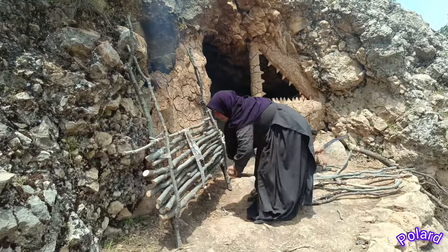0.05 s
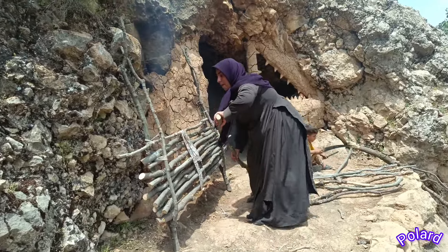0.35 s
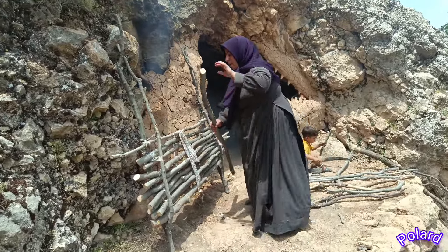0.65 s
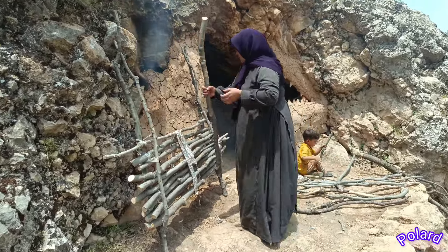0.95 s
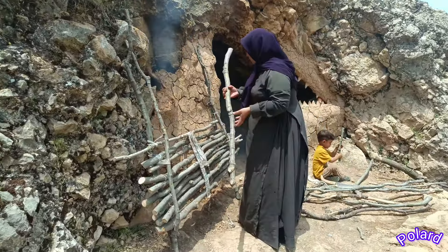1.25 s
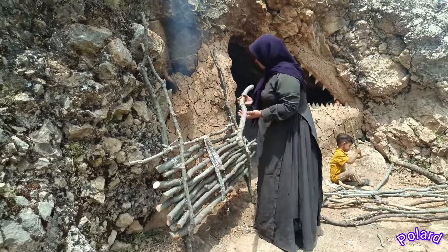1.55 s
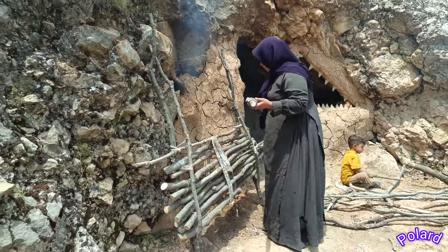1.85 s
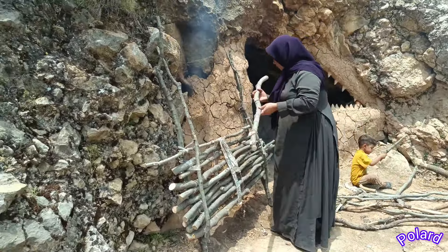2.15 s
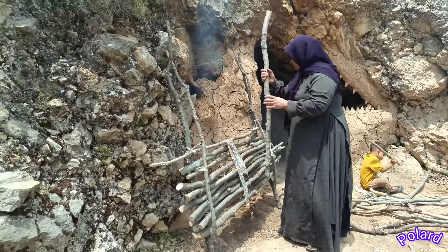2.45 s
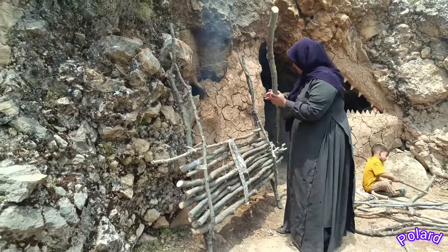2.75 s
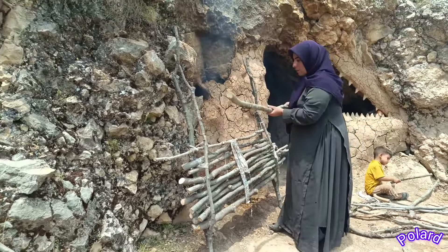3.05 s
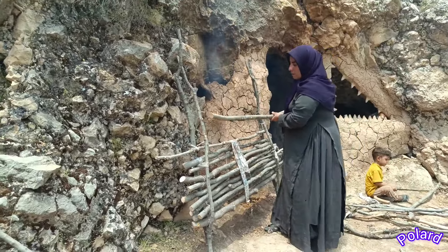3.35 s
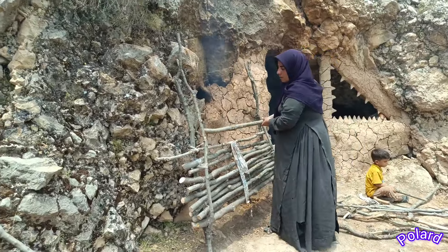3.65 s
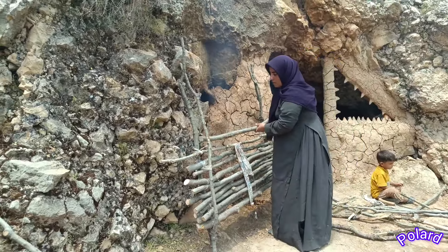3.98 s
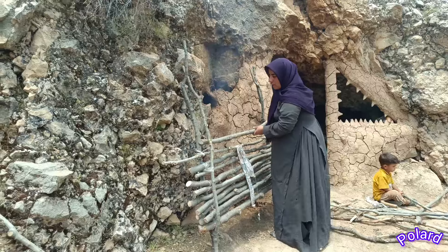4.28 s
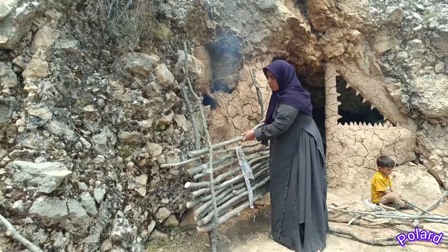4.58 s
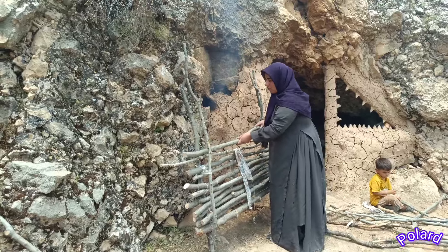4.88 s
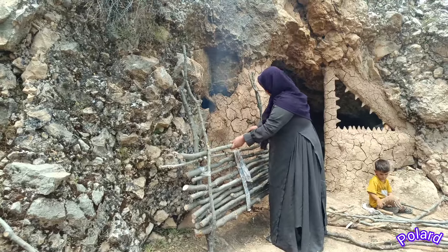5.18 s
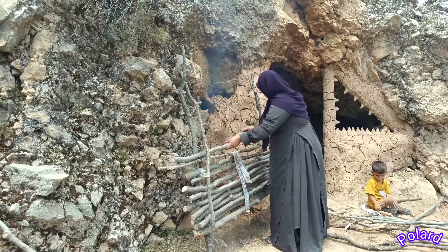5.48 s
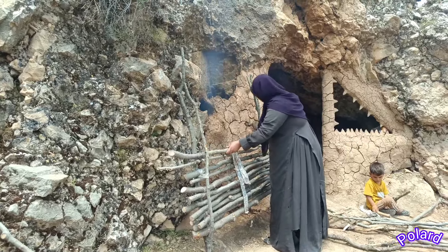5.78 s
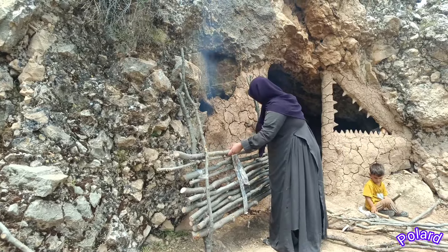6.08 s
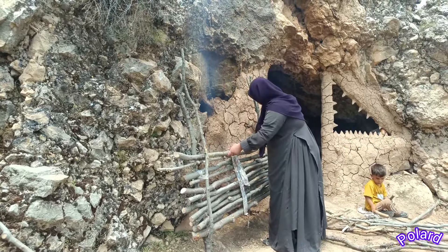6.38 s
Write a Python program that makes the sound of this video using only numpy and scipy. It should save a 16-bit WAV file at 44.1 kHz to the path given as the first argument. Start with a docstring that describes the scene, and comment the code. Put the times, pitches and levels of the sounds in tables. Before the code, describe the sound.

Dry sticks tap, chatter and skid against a wooden gate, close to the microphone. One is struck home with a loud, bright clack, followed soon by a second, hollower knock. Softer bumps, rasps and rustles of bark and cloth continue, with a small twig snap. Near the end a distant bird chirps a few times. The outdoor air is quiet, and nearby rock adds a faint echo.

```python
"""Sticks worked into a gate

Dry sticks knock, chatter and skid on a lashed wooden gate, close by; twice one is struck home hard.
Each impact excites the bending modes of the wood and the dense, short ring of the whole bundle.
Friction of bark and cloth rustles and rasps between the knocks, and a rock face reflects a faint tail.
A far bird chirps and a thin twitter flickers over the quiet outdoor air."""
import sys
import numpy as np
from scipy import signal
from scipy.fft import rfft, irfft, next_fast_len
from scipy.io import wavfile
from scipy.ndimage import uniform_filter1d

SR = 44100
rng = np.random.default_rng(int(sys.argv[2]) if len(sys.argv) > 2 else 0)


def to_wav(s):
    """Save 16-bit WAV."""
    ch = np.atleast_2d(s).T  # columns
    pcm = np.round(np.clip(ch, -1, 1) * 32767)  # PCM
    wavfile.write(sys.argv[1], SR, pcm.astype(np.int16))


N = 283384

# left-right coherence of diffuse sound and of the near wood: (frequency [Hz], coherence [0-1])
AIR_COHERENCE = [(40, 0.2), (150, 0.32), (500, 0.29), (1500, 0.08), (4000, 0), (15000, 0)]
WOOD_COHERENCE = [(150, 0.89), (700, 0.98), (2000, 0.36), (4000, 0.41), (12000, 0.21)]


def amp(db):
    """Amplitude ratio of a level in decibels."""
    return 10 ** (np.asarray(db) / 20)


def unit(x):
    """Normalisation to a mean energy of 1 per channel."""
    return x / np.sqrt(np.sum(x ** 2) / 2 + 1e-30)


def read(points, hz):
    """Interpolation of (frequency [Hz], value) points on a logarithmic frequency axis."""
    f, value = np.transpose(points)
    return np.interp(np.log(hz + 1), np.log(f + 1), value)


def add(mix, s, sound):
    """Superposition: a stereo sound joins the mix at time s."""
    part = mix[:, max(round(s * SR), 0):][:, :sound.shape[1]]
    part += sound[:, :part.shape[1]]


def noise(spectrum, coherence, size):
    """Partially coherent stereo noise with a spectrum of (frequency [Hz], density [dB]) points."""
    hz = np.fft.rfftfreq(size, 1 / SR)
    a, b = rfft(rng.standard_normal((2, size)))
    same = np.clip(read(coherence, hz), 0, 1)
    mid, side = np.sqrt(1 + same) * a, np.sqrt(1 - same) * b
    return irfft(np.array([mid + side, mid - side]) * amp(read(spectrum, hz)), size)


def crackle(rate, size, life_s):
    """Shot-noise envelope: random catches of uneven strength, each decaying exponentially."""
    catches = (rng.random(size) < rate / SR) * rng.exponential(1, size)
    return signal.lfilter([1], [1, -np.exp(-1 / (life_s * SR))], catches)


def die_away(x, t60s, frame, hold_s=0, damping=1):
    """Frequency-dependent damping: after hold_s, each frequency decays at its own rate."""
    hz, t, spectra = signal.stft(x, SR, nperseg=frame)
    decay = amp(-60 * damping * np.maximum(t - hold_s, 0) / read(t60s, hz)[:, None])
    return signal.istft(spectra * decay, SR, nperseg=frame)[1][:, :x.shape[1]]


def equalise(x, band_db, left_lag_ms=0):
    """A minimum-phase filter sets five band energies, each given as the rms level of a 10 ms burst."""
    # band centres: (thud [Hz], body [Hz], clack [Hz], crack [Hz], tick [Hz])
    bands_hz = [200, 650, 1800, 4000, 9500]
    size = next_fast_len(2 * x.shape[1], True)
    hz, spectrum = np.fft.rfftfreq(size, 1 / SR), rfft(x, size)
    shares = np.array([np.interp(np.log(hz + 1), np.log(bands_hz), row) for row in np.eye(5)])
    power = (abs(spectrum) ** 2).mean(0) * 2 / size / (SR / 100)
    gain_db = np.zeros(len(hz))
    for _ in range(3):  # the bands overlap, so the gains settle by iteration
        reached_db = 10 * np.log10(shares ** 2 @ (power * amp(gain_db) ** 2) + 1e-30)
        gain_db += (band_db - reached_db) @ shares
    cepstrum = irfft(np.log(amp(gain_db)), size)
    spectrum *= np.exp(rfft(2 * cepstrum[:size // 2], size) - cepstrum[0])
    spectrum[0] *= np.exp(-2j * np.pi * hz * left_lag_ms / 1000)
    return irfft(spectrum, size)[:, :x.shape[1]]


def air(db=-64.5):
    """Quiet outdoor air: a diffuse field of stationary noise."""
    # ambient spectrum: (frequency [Hz], density [dB])
    spectrum = [(20, -6.5), (42, -22), (70, -8.5), (125, 0.5), (290, 0), (450, -4), (700, -4.5), (1100, -9),
                (2200, -10), (4000, -15), (6300, -17), (7100, -21), (9300, -19), (11500, -23.5),
                (15800, -21.5)]
    return amp(db) * np.sqrt(N) * unit(noise(spectrum, AIR_COHERENCE, N))


def twitter(db=-83, hz=6250, flickers_per_s=7):
    """Very distant birds or insects: narrow-band noise under random amplitude modulation."""
    marks = np.arange(0, N / SR + 1, 1 / flickers_per_s)
    flicker = np.interp(np.arange(N) / SR, marks, rng.random(len(marks)) ** 2)
    band = [(.85 * hz, -40), (.96 * hz, 0), (1.03 * hz, 0), (1.1 * hz, -45)]
    return amp(db) * flicker * np.sqrt(N) * unit(noise(band, AIR_COHERENCE, N))


def bird(length_s=.0181, fall=.278, blur_s=.0063, rasp=.084):
    """Falling chirps, roughened by frequency jitter and blurred by multipath scattering."""
    # calls: (time [s], level [dB], starting pitch [Hz])
    chirps = [(5.715, -70, 2300), (5.857, -66, 2510), (5.983, -61, 2566), (6.165, -64, 2500),
              (6.353, -65.5, 2435)]
    out, t = np.zeros((2, N)), np.arange(2048) / SR
    progress = np.clip(t / length_s, 0, 1)
    for s, db, hz in chirps:
        jitter = rasp * uniform_filter1d(rng.standard_normal(len(t)), size=36) * np.sqrt(36)
        pitch_hz = hz * (1 - fall * progress + jitter)
        chirp = np.sin(np.pi * progress) * np.sin(2 * np.pi * np.cumsum(pitch_hz) / SR)
        paths = rng.standard_normal((2, len(t))) * np.exp(-t / blur_s)
        scattered = signal.fftconvolve(paths, chirp[None], axes=1)
        add(out, s, amp(db) * np.sqrt(length_s * SR) * unit(scattered))
    return out


def rock(x, echo_db=-35, build_s=.023):
    """Reverberation: reflections from the rock face and its hollows merge into a faint tail."""
    # reverberation times: (frequency [Hz], T60 [s])
    t60s = [(150, 2.1), (700, 0.4), (2500, 1.2), (5000, 0.9), (12000, 0.11)]
    colour = [(80, -6), (250, 0), (700, 4.5), (2000, -10), (2700, -9), (3400, -5.5), (5000, -2),
              (15000, -16.5)]
    tail = die_away(noise(colour, AIR_COHERENCE, SR), t60s, frame=256)
    tail *= 1 - np.exp(-np.arange(SR) / SR / build_s)
    return amp(echo_db) * signal.fftconvolve(x, unit(tail), axes=1)[:, :N]


def low_swell(s=.572, length_s=.11, db=-62):
    """A soft swell of low-frequency noise rises and fades once."""
    swell = np.sin(np.pi * np.clip((np.arange(N) / SR - s) / length_s, 0, 1))
    colour = [(30, -25), (55, -14), (90, 0), (150, -1), (300, -20), (2000, -50)]
    return amp(db) * swell * np.sqrt(N) * unit(noise(colour, WOOD_COHERENCE, N))


def rasps(width=.05, size=16384):
    """Stick-slip friction: bark drawn under the lashing excites one narrow resonance."""
    # pulls: (time [s], length [s], resonance [Hz], level [dB])
    pulls = [(3.3, .22, 4400, -75.5), (5.056, 0.17, 3400, -74), (5.422, 0.15, 3270, -69)]
    out = np.zeros((2, N))
    near, far = 1 + width, 1 + 4 * width
    for s, length, hz, db in pulls:
        swell = np.sin(np.pi * np.clip(np.arange(size) / SR / length, 0, 1))
        band = [(hz / far, -30), (hz / near, -8), (hz, 0), (hz * near, -8), (hz * far, -30)]
        add(out, s, amp(db) * swell * np.sqrt(size) * unit(noise(band, AIR_COHERENCE, size)))
    return out


def snaps(fade_s=.004, size=1024):
    """Brittle fracture: a twig or flake of bark snaps with one bright, dry tick."""
    # fractures: (time [s], level [dB])
    fractures = [(1.298, -64), (2.679, -64), (2.699, -70), (2.757, -71), (4.345, -69), (5.376, -51.5)]
    colour = [(500, -32), (2500, -3.5), (6000, -14), (8200, 9), (9800, -1), (12000, -1), (16000, -14)]
    out = np.zeros((2, N))
    for s, db in fractures:
        tick = noise(colour, WOOD_COHERENCE, size) * np.exp(-np.arange(size) / SR / fade_s)
        add(out, s, amp(db) * np.sqrt(SR / 100) * unit(tick))
    return out


def rubs(grain=2.4, size=16384):
    """Sliding friction of bark and cloth: a grainy hiss swells and fades, with twig ticks in it."""
    # strokes: (time [s], nominal length [s], strength [dB], brightness [dB])
    strokes = [(0, .11, -57, -5), (.521, .058, -63.5, 5), (1.214, .11, -57, -2), (1.33, .14, -58.5, -0.5),
               (2.278, .076, -67, 4), (2.89, .072, -59.5, 6.5), (3.13, .16, -63.5, -2),
               (3.306, .31, -61, 0.5), (4.721, .37, -61, 0), (4.929, .23, -57, 0.5), (5.21, .21, -66, 3.5),
               (5.426, .098, -61, 6.5)]
    # thud to tick band: levels [dB], and what one dB of brightness adds
    colour_db, brightening = np.array([-1, -4.5, .5, -2, -2]), np.array([-1.2, -.24, -.1, .41, .85])
    spectrum = [(50, -30), (170, -1.5), (600, .5), (3050, -9), (3350, -8.5), (3650, -6.5), (4600, -10),
                (6500, -10), (9000, -1.5), (12000, -15.5), (16000, -14)]
    out = np.zeros((2, N))
    for s, length, db, bright_db in strokes:
        progress = np.clip(np.arange(size) / min(1.29 * length * SR, size), 0, 1)
        swell = (4 * progress * (1 - progress)) ** .75
        catches = np.exp(grain * uniform_filter1d(rng.standard_normal(size), size=100))
        twigs = .7 * crackle(120, size, life_s=.002)
        hiss = noise(spectrum, AIR_COHERENCE, size) * swell * (catches + twigs)
        add(out, s - .012, equalise(hiss, db + colour_db + bright_db * brightening))
    return out


def bending_ring(modes, t, free_s, damping, detune):
    """Modal vibration: damped sinusoids, each detuned at random by the grip."""
    hz, db, t60 = np.transpose(modes)[:, :, None]
    shift, phase, skew = rng.standard_normal((3, len(modes), 1))
    angle = 2 * np.pi * (hz * (1 + detune * shift) * t + phase)
    spread = .34 * skew * np.arccos(np.clip(read(WOOD_COHERENCE, hz), 0, 1))
    decay = amp(db - 60 * damping * free_s / t60)
    return np.array([(decay * np.sin(angle + side * spread)).sum(0) for side in (-1, 1)])


def bundle_ring(chatter_s, damping, size):
    """Modal overlap: the bundle rings as uneven noise, fed during contact and decaying after it."""
    # response of the bundle: (frequency [Hz], density [dB])
    spectrum = [(40, -35), (90, -30), (160, -4.5), (270, 6), (420, -5.5), (680, -1.5), (1300, 3), (2400, 1),
                (4300, -10), (5600, -15), (7000, -20.5), (9200, -18.5), (12000, -42), (16000, -30.5)]
    # its decay: (frequency [Hz], T60 [s])
    t60s = [(150, 0.25), (500, 0.083), (1500, 0.088), (4000, 0.091), (10000, 0.075)]
    ring = die_away(noise(spectrum, WOOD_COHERENCE, size), t60s, 128, chatter_s, damping)
    return ring * np.exp(2 * uniform_filter1d(rng.standard_normal(size), size=49))


def strike(s, band_db, chatter_s, modes, ring_db, tick_db, damping, detune, rise_s, impact, impact_s,
           catches, size, low_hz=90):
    """Impact excitation: a stick chatters on another, then its modes and the bundle ring freely."""
    # place of the hands along the gate: (time [s], lag of the left channel [ms])
    hands = [(.42, 0.04), (.5, -0.082), (.66, .16), (1.06, .14), (1.3, .03), (1.87, .205), (2.63, .28),
             (2.82, 0.4), (3.02, -0.14), (4.62, -.05), (5.8, 0.032)]
    t = np.arange(size) / SR
    free_s = np.maximum(t - chatter_s, 0)  # time since the contact ended
    ring = bending_ring(modes, t, free_s, damping, detune)
    bundle = bundle_ring(chatter_s, damping, size)
    force = (1 - np.exp(-t / rise_s)) * (1 + impact * np.exp(-t / impact_s))  # hardest at first
    force *= 1 + .2 * crackle(220, size, life_s=.001) * (t < chatter_s)  # repeated contacts
    body = (unit(bundle) + amp(ring_db) * unit(ring)) * force
    first_touch = 1.5 * np.exp(-abs(t - .0014) / .001)
    bark = catches * crackle(300, size, life_s=.0006) * np.exp(-free_s / .0067)
    tick_colour = [(300, 9.5), (2000, 2.5), (6000, -13), (9200, 3.5), (16000, -24)]
    ticks = noise(tick_colour, WOOD_COHERENCE, size) * (first_touch + bark)
    # thin wood radiates almost no deep bass
    radiation = signal.butter(3, low_hz, "high", fs=SR, output="sos")
    sound = signal.sosfilt(radiation, body + amp(tick_db) * unit(ticks))
    return s, equalise(sound, band_db, left_lag_ms=np.interp(s, *np.transpose(hands)))


def contact(row, colour_db, modes, brief_s=.0028, **touch):
    """Contact stiffness: bare wood is bright, lashing dull; the briefest touches are damped most."""
    # gain per dB of hardness, in the bands of colour_db: (body, clack, crack, tick [dB/dB])
    hardening = (-1.06, -0.022, 0.75, 0.57)
    s, strength_db, hardness_db, thud_db, chatter_s = row  # the thud is the weight behind the stick
    shape_db = np.array(colour_db) + hardness_db * np.array(hardening)
    shape_db -= 10 * np.log10(np.sum(amp(shape_db) ** 2))
    grip = .83 + (brief_s / max(chatter_s, .001)) ** 2
    return strike(s, np.r_[thud_db, strength_db + shape_db], chatter_s, modes, damping=grip, **touch)


def bumps(bounce_s=.037):
    """Dull impacts excite the frame's low modes; after each blow it falls back and rebounds once."""
    # bumps: (time [s], strength [dB], hardness [dB], thud [dB], chatter [s])
    hits = [(.486, -51.5, -6, -53.5, .014), (3.88, -52.5, -1, -46.5, 0.0071),
            (4.285, -56.5, 3.5, -56, 0.0081), (5.172, -45.5, -12.5, -56, 0.0069),
            (5.828, -53, -7.5, -53.5, 0.015)]
    # falls against the lashing: (time [s], strength [dB])
    falls = [(1.968, -49.5), (2.807, -46)]
    # modes of the frame: (frequency [Hz], level [dB], T60 [s])
    modes = [(131, -9, 0.15), (209.5, -6.5, 0.13), (315, -3.5, 0.068), (392, -14, 0.072), (568, -8, 0.059),
             (625, -12, 0.11), (1104, -12, 0.07), (1200, -14, 0.081)]
    out, rows = np.zeros((2, N)), list(hits)
    for s, db in falls:
        rows += [(s, db, -14, db - 1, .0099), (s + bounce_s, db - 17.5, 0, db - 9.5, .004)]
    for row in rows:
        add(out, *contact(row, (.5, -1.5, -1, -3), modes, ring_db=2, tick_db=-27, detune=.022,
                          rise_s=.00032, impact=.42, impact_s=.007, catches=1, size=5120))
    return out


def skids():
    """Intermittent contact: a stick skids along the loose rail and excites its lightly damped modes."""
    # skids: (time [s], strength [dB], hardness [dB], thud [dB], chatter [s])
    hits = [(0.812, -46.5, 2, -48.5, 0.0099), (0.883, -40, -2.5, -52, 0.014), (0.904, -46.5, 4, -72, 0.022),
            (.982, -43, 2.5, -52.5, 0.032), (1.032, -47, 12, -89, 0.017), (1.053, -46.5, 2, -59, .011),
            (1.155, -54, -4, -59, 0.025)]
    # modes of the rail: (frequency [Hz], level [dB], T60 [s])
    modes = [(516.4, -9, 0.37), (594, -2.5, 0.14), (632, 0, 0.22), (738, -7, 0.32), (970, -12, 0.5),
             (1140, -10, 0.23), (1296, -6, 0.24), (1670, -8, 0.13), (2136, -6, 0.1), (2480, -15, 0.13),
             (2760, -23, .1), (3770, -10, 0.047), (4300, -17, .06)]
    out = np.zeros((2, N))
    for row in hits:
        add(out, *contact(row, (2.5, .5, -3, -4), modes, ring_db=2.5, tick_db=-18.5, detune=.016,
                          rise_s=.0004, impact=.3, impact_s=.0082, catches=1.6, size=8192))
    return out


def taps(note_db=2, note_t60_s=.045):
    """A collision excites both bodies: the tapping stick adds its note to the modes of the upright."""
    # taps: (time [s], strength [dB], hardness [dB], thud [dB], chatter [s], stick note [Hz])
    hits = [(.135, -54, 1, -55, 0.011, 1250), (.178, -48, -2.5, -47.5, .008, 3500),
            (.197, -54, 1, -79, 0.0066, 2600), (0.264, -43.5, -2, -51, .016, 1500),
            (.279, -51, -5.5, -50.5, 0.0087, 680), (.393, -36, -4.5, -49.5, 0.018, 1950),
            (0.429, -48.5, 1, -56, .005, 1850), (.465, -49, -8, -62, 0.025, 1150),
            (0.657, -56.5, -6, -60, 0.0021, 1100), (.712, -54, -7, -56.5, 0.0017, 950),
            (1.298, -50.5, -5.5, -57.5, 0.0023, 1700), (1.45, -51, 5, -68.5, 0.0043, 2000),
            (1.77, -56, -4, -63.5, 0.0014, 750), (3.02, -61, -5.5, -67, 0.002, 620),
            (4.174, -54.5, -11.5, -56, 0.0088, 1100), (4.551, -57, 5.5, -61, 0.01, 2800),
            (4.604, -53, 5.5, -63, .023, 3300), (4.624, -45, -10.5, -47, 0.011, 900),
            (5.375, -50.5, 2.5, -61, 0.0045, 2600)]
    # modes of the upright: (frequency [Hz], level [dB], T60 [s])
    upright = [(213, -18, 0.24), (417, -6, 0.13), (497, -2.5, 0.041), (605.5, -3, 0.12), (676, 2.5, 0.1),
               (930, -9, 0.044), (1103, 0, 0.04), (1398, -9.5, 0.038), (1645, -0.5, 0.058),
               (1857, -18.5, 0.049), (1960, -14, 0.037), (2107, -8, 0.04), (2440, -27, 0.076),
               (2870, -12, 0.025)]
    out = np.zeros((2, N))
    for *row, note_hz in hits:
        modes = [*upright, (note_hz, note_db, note_t60_s)]
        add(out, *contact(row, (-2, 1.5, -4, -3.5), modes, ring_db=1, tick_db=-24.5, detune=.027,
                          rise_s=.00077, impact=1.1, impact_s=.006, catches=1, size=5120))
    return out


def blows():
    """Hard impacts drive bending modes: a bright clack on the thin stick, a hollow one on the pole."""
    # blows on stick and pole: (time [s], strength [dB], chatter [s])
    hits = [(1.8705, -17.5, .01), (2.6311, -21.5, .007)]
    # modes of the thin stick and the thick pole: (frequency [Hz], level [dB], T60 [s])
    stick = [(255, -15, .13), (603, -17, .09), (958, -8, .066), (1203, -12, .07), (1455, -10, .059),
             (1729, -6, .052), (1843, -7, .065), (1960, -2, .058), (2018, 1, .06), (2328, -4, .052),
             (2471, -5, .062), (2722, 0, .052), (2904, -7, .065), (3140, -7, .055), (3331, -9, .055),
             (3560, -13, .055), (3941, -10, .052), (4400, -16, .048)]
    pole = [(196, -16, .2), (254, -9, .16), (308, -8, .16), (517, -9, .11), (592, -4, .13), (740, 1, .135),
            (736, -27.5, 1.15), (953, -11, .1), (1034, -3, .08), (1196, -11, .11), (1265, -8, .11),
            (1470, -10, .085), (1663, -2, .06), (1947, -8, .07), (2250, -12, .055), (2465, -10, .065),
            (3030, -14, .06), (3560, -16, .055)]
    # band levels, thud to tick
    stick_db, pole_db = np.array([-20, -12, .3, -5.2, -18]), np.array([-14.3, -2.2, -.5, -11.5, -17])
    out = np.zeros((2, N))
    s, db, chatter_s = hits[0]
    add(out, *strike(s, db + stick_db, chatter_s, stick, ring_db=3, tick_db=-9, damping=1.2, detune=0,
                     rise_s=.0011, impact=.2, impact_s=.009, catches=1.6, size=8192, low_hz=80))
    s, db, chatter_s = hits[1]
    add(out, *strike(s, db + pole_db, chatter_s, pole, ring_db=3, tick_db=-8.5, damping=.95, detune=0,
                     rise_s=.0011, impact=1, impact_s=.0068, catches=1.3, size=20480, low_hz=153))
    return out


def scene():
    """Superposition of the direct sound of the gate, its reverberation, the birds and the air."""
    wood = taps() + bumps() + skids() + blows() + rubs() + snaps() + rasps() + low_swell()
    return wood + rock(wood) + bird() + twitter() + air()


def record(dry):
    """Frequency response: two microphone ports of unequal colour, then a 16 kHz band limit."""
    # (frequency [Hz], left over right [dB])
    balance = [(200, -.2), (800, .5), (2000, 0), (4000, .5), (7500, 3.5), (9300, -2.5), (12000, .5),
               (15000, 2)]
    tilt_db = read(balance, np.fft.rfftfreq(N, 1 / SR))
    ports = amp([tilt_db / 2, -tilt_db / 2])
    heard = irfft(rfft(dry) * ports / np.sqrt((ports ** 2).mean(0)), N)
    band_limit = signal.firwin(511, 16000, window=("kaiser", 9), fs=SR)
    return signal.oaconvolve(heard, band_limit[None], "same")


dry = scene()
out = record(dry)
to_wav(out)
```